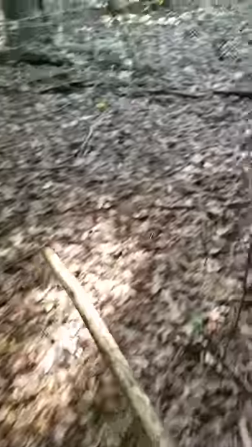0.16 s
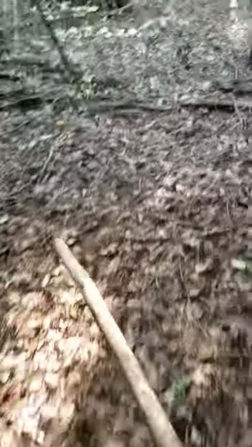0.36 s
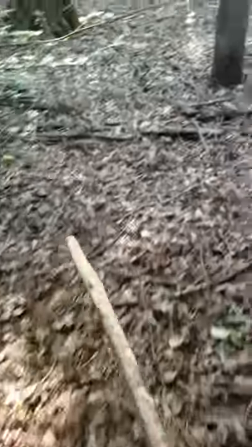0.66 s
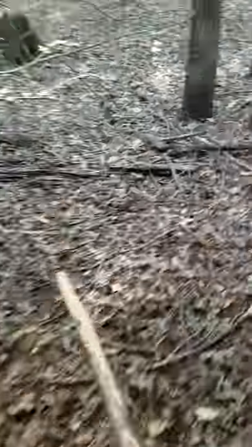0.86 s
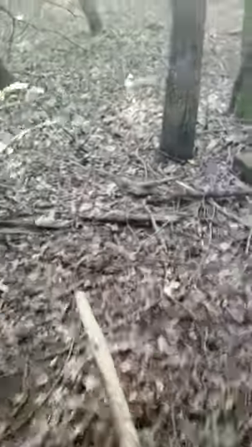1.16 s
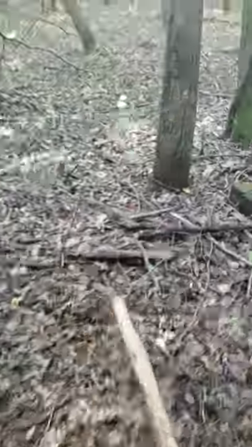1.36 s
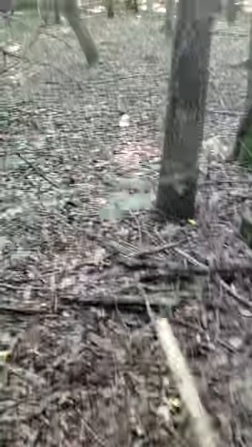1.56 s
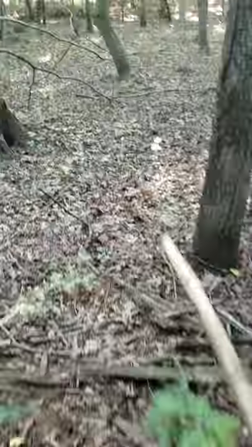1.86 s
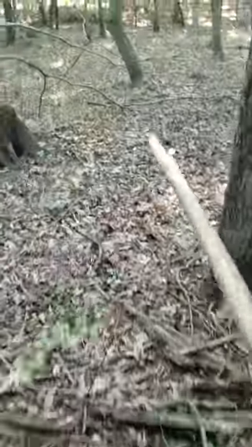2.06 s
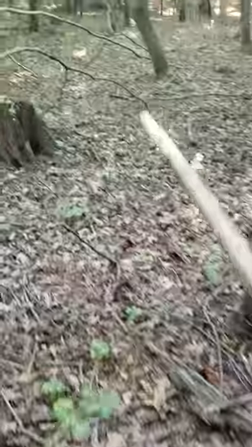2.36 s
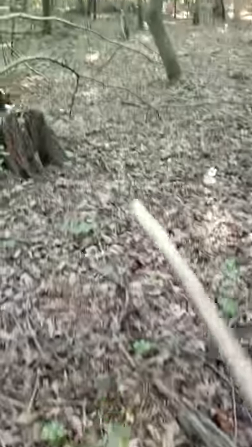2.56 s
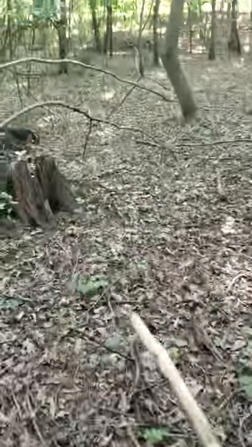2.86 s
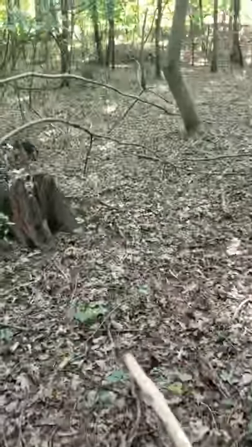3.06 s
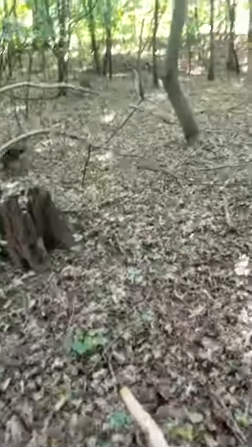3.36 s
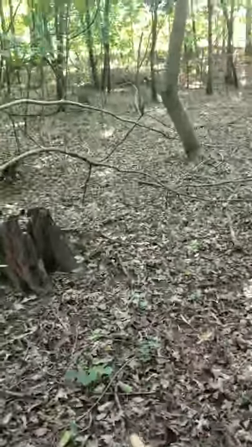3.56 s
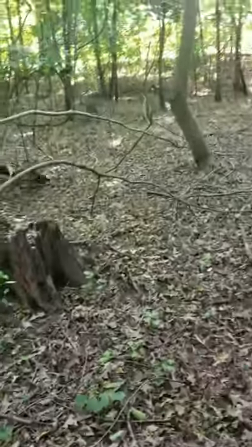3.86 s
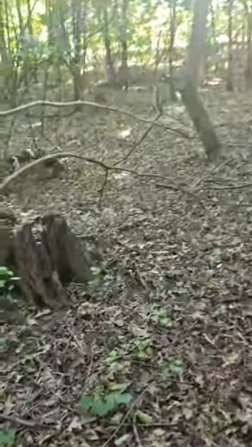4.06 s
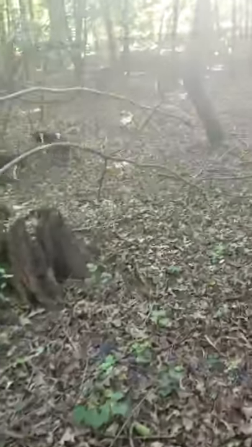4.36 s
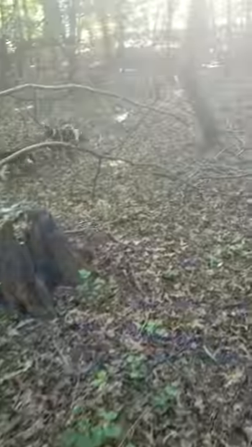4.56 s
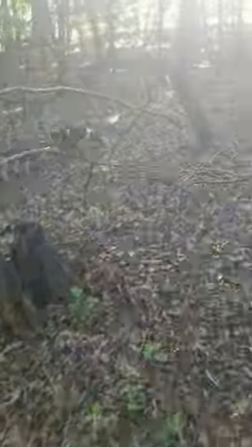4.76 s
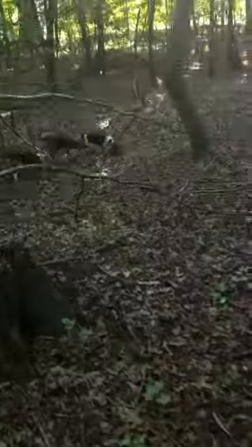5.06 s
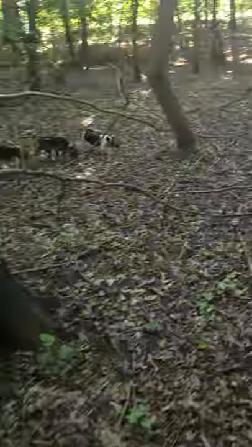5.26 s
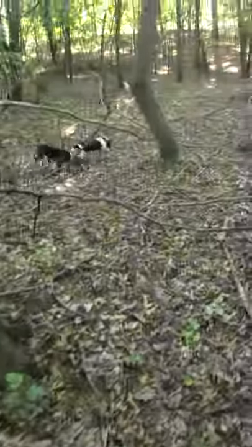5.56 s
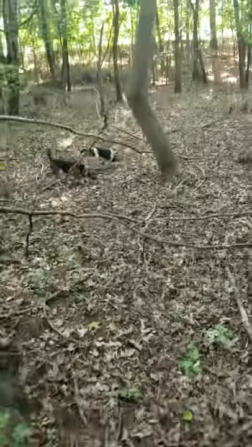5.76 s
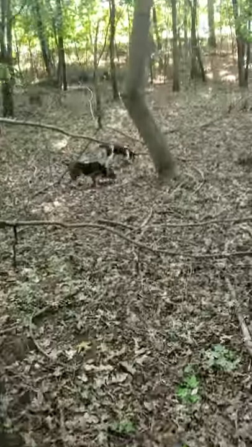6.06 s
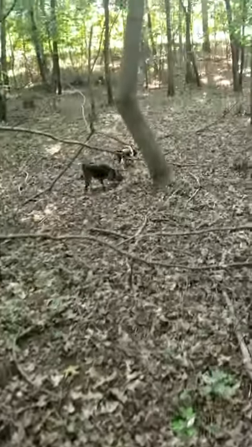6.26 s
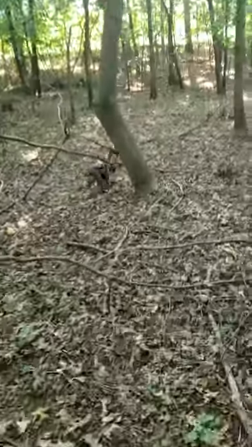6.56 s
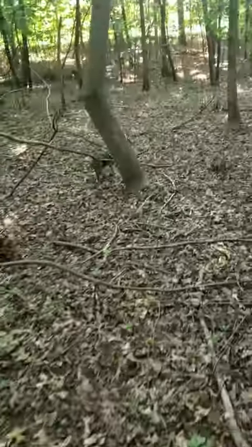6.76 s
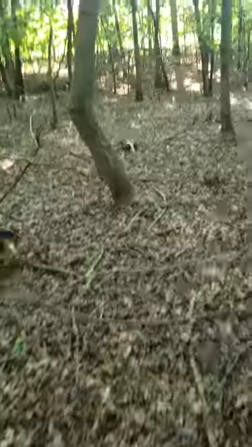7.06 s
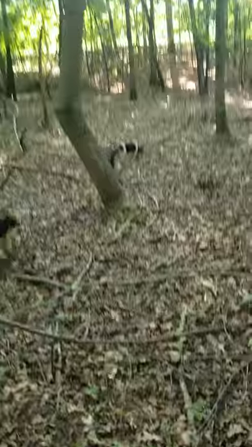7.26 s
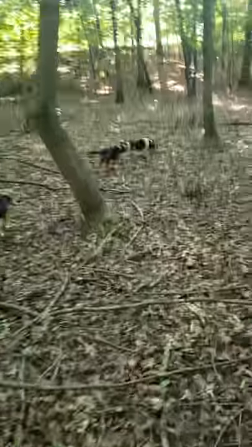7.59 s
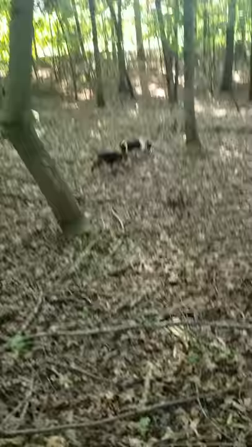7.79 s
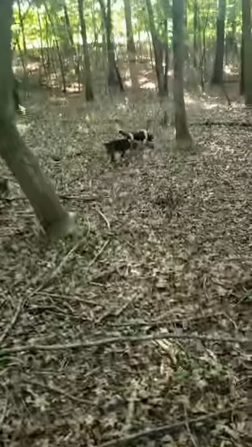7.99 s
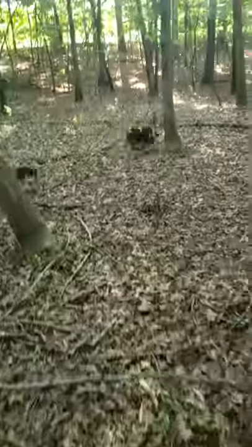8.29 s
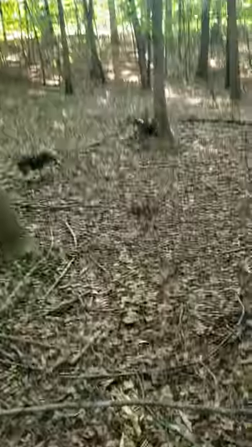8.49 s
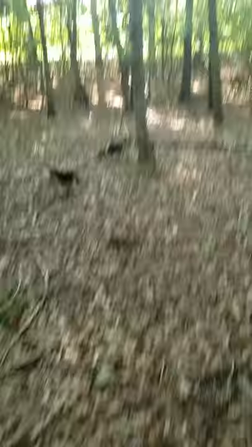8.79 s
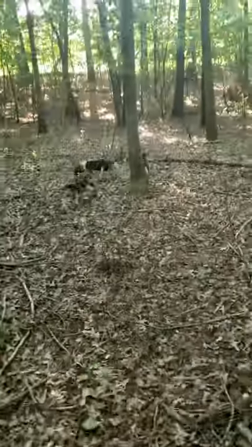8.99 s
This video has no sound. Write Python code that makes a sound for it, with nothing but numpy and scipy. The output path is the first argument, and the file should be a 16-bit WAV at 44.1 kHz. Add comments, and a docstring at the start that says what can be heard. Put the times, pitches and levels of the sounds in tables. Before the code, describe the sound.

Two hounds bay and yelp in quick, overlapping calls in a leafy wood while feet rustle dry leaves and twigs snap close by.

```python
"""Two hounds on a trail in a leafy wood

One hound bays in arched notes, the other yelps high and breaks an octave down: partials on pitch curves, plus
breath noise in throat resonances. A scattered noise tail makes the soft echo of the trunks. Close by, feet rustle
dry leaves (noise and short grains), twigs snap (noise bursts) and a hand knocks the phone (decaying sines).
A faint canopy hiss and a low rumble lie beneath."""
import sys
import numpy as np
from scipy import signal
from scipy.fft import rfft, irfft, next_fast_len
from scipy.io import wavfile
from scipy.ndimage import map_coordinates

SR = 44100
rng = np.random.default_rng(int(sys.argv[2]) if len(sys.argv) > 2 else 0)


def to_wav(sig):
    """Store sig (one row per channel, or 1-D mono) as 16-bit WAV at the path in sys.argv[1].

    Samples outside -1..1 are clipped; the rate is SR.
    """
    pcm = np.clip(np.atleast_2d(sig), -1, 1) * 32767
    pcm = np.round(pcm).astype(np.int16)
    wavfile.write(sys.argv[1], SR, pcm.T)  # frames by channels


N = 402633

# flutter of both voices: depth, knots per second
FLUTTER_DB, FLUTTER_RATE = 2, 70


def amp(db):
    """dB to amplitude."""
    return 10 ** (np.asarray(db) / 20)


def unit(x):
    """Scale to unit RMS."""
    return x / np.sqrt(np.mean(x ** 2) + 1e-20)


def along(points, hz, order=1):
    """Interpolate one column of (f/Hz, value, ..) points on a log frequency axis."""
    table = np.transpose(points)
    return np.interp(np.log(hz + 1), np.log(table[0] + 1), table[order])


def wobble(rate, size=N):
    """Smooth random curve, rate knots per second."""
    knots = rng.standard_normal(int(size * rate / SR) + 4)
    return map_coordinates(knots, [np.arange(size) * rate / SR])


def filtered(x, response):
    """Apply a complex response of frequency in Hz."""
    m = next_fast_len(N + SR // 2)
    spectrum = rfft(x, m) * response(np.fft.rfftfreq(m, 1 / SR))
    return irfft(spectrum, m)[..., :N]


def add(track, start_s, sound):
    """Mix a sound into a track at start_s."""
    part = track[..., round(start_s * SR):][..., :sound.shape[-1]]
    part += sound[..., :part.shape[-1]]


def seconds(size):
    """Time axis of size samples."""
    return np.arange(size) / SR


def port_gain(hz):
    """Two microphone ports differ in colour and phase; each takes half the difference, with opposite sign."""
    # left over right: f/Hz, level/dB, phase lead/rad
    port_points = [(585, 1, 0.48), (1420, 2, 1.48), (3250, 5, 2), (4630, -3.5, -1), (9200, -3.5, -14.5)]
    half = amp(along(port_points, hz) / 2) * np.exp(.5j * along(port_points, hz, order=2))
    return np.array([half, 1 / half])


def ports(x):
    """A far sound as the two ports take it."""
    return filtered(x, port_gain)


def handling():
    """Low rumble of far traffic and air as shaped noise; hand knocks on the phone edges as decaying sines."""
    # rumble spectrum before levelling: f/Hz, density/dB per Hz
    rumble_points = [(20, -26), (64, -4.5), (150, -18), (500, -36.5)]
    # knocks: t/s, level before side offset and decay/dB, edge of the phone
    knocks = [(1.017, -26, "left"), (1.469, -12, "right"), (3.405, -14.5, "left"), (3.587, -16.5, "left"),
              (4.095, -13, "right"), (5.477, -15.5, "right"), (5.564, -15, "both"), (5.631, -8.5, "right")]
    # edge: f/Hz, left offset/dB, right offset/dB
    edge_modes = {"left": (240, 0, -8), "right": (86, -24, 0), "both": (330, 0, 0)}
    shared, own = rng.standard_normal(N), rng.standard_normal((2, N))
    rumble = unit(filtered(shared + own, lambda hz: amp(along(rumble_points, hz))))
    track = rumble * amp([[-48], [-45]])  # left, right
    t = seconds(SR // 10)
    for start_s, db, edge in knocks:
        hz, *sides_db = edge_modes[edge]
        thud = np.sin(2 * np.pi * hz * t)
        decay = amp(-60 * t * hz / 6)  # 60 dB in six cycles
        add(track, start_s, amp(db + np.c_[sides_db]) * thud * decay)
    return track


def rustle_level():
    """Treads rise and fade in power over the steady canopy hiss; the sum flutters at two rates."""
    # treads of feet and paws: t/s, length/s, level above 4.5 kHz before flutter/dB
    treads = [(0.24, 0.041, -35.5), (0.84, 0.1, -45.5), (1.127, 0.34, -48.5), (1.395, 0.3, -36.5),
              (1.989, 0.18, -38), (2.332, 0.66, -42.5), (3.26, 0.24, -40), (3.618, 0.31, -36.5),
              (4.011, 0.18, -39.5), (4.316, 1, -45.5), (5.373, 0.065, -29), (5.46, 0.22, -38.5),
              (5.939, 0.058, -37), (6.28, 0.35, -43), (6.837, 0.57, -43.5), (7.524, 0.41, -43),
              (8.091, .2, -39), (8.346, 0.076, -35.5), (8.699, 0.29, -40)]
    canopy_db, rise_s, fade_s = -55, 0.015, 0.1
    power = np.full(N, amp(canopy_db) ** 2)
    for start_s, length_s, db in treads:
        t = seconds(round((length_s + 0.27) * SR))
        fade = np.exp(-np.clip(t - length_s, 0, 1) / fade_s)
        add(power, start_s, (amp(db) * np.clip(t / rise_s, 0, 1) * fade) ** 2)
    return np.sqrt(power) * amp(2.5 * wobble(9) + 2.5 * wobble(30))


def stereo_noise(*rows):
    """Noise with equal shared and per-channel parts."""
    return rng.standard_normal((*rows, 1, N)) + rng.standard_normal((*rows, 2, N))


def leaf_crackle():
    """Steady hiss plus random short crunches of big to small leaves, each size in its own band."""
    cracks_per_s, decay60_s = 25, .012
    band_hz = np.reshape([4000, 8000, 13000], (3, 1, 1))
    heights = amp(6 * rng.exponential(size=(3, N))).clip(0, 10)
    cracks = (rng.random((3, N)) < cracks_per_s / SR) * heights
    decay = amp(-60 * seconds(SR // 20) / decay60_s)
    bursts = signal.fftconvolve(cracks, decay[None], axes=1)[:, None, :N]

    def bands(hz):
        return band_hz ** -.5 / (1 + (np.log(hz / band_hz + 1e-9) / .4) ** 2)

    grains = filtered(bursts * stereo_noise(3), bands)
    crunch = sum(unit(g) * (k + 1) for k, g in enumerate(grains))  # smaller leaves weigh more
    return unit(stereo_noise()) + .9 * unit(crunch)


def twig_snaps():
    """Twigs and crisp leaves: high-passed noise bursts with a sharp decay and a weak slower one."""
    # t/s, level before leaf colour and scaling/dB
    snaps = [(0.152, -28.5), (0.2483, -16), (0.2927, -17), (.848, -31), (1.346, -29), (1.47, -14),
             (1.5183, -17.5), (1.5722, -16.5), (1.728, -19), (2.1238, -19.5), (2.8624, -17), (3.4124, -19),
             (4.0956, -19), (4.7497, -19.5), (4.9636, -20.5), (5.4755, -8.5), (5.5671, -9.5),
             (6.4573, -20.5), (7.0831, -18), (7.8303, -20.5), (9.0019, -16.5)]
    track = np.zeros((2, N))
    high_pass = signal.butter(2, 2000, "high", fs=SR)
    t = seconds(SR // 20)
    decay = amp(-60 * t / .009) + .07 * amp(-60 * t / .05)
    for start_s, db in snaps:
        noise = signal.lfilter(*high_pass, rng.standard_normal((2, len(t))))
        add(track, start_s, amp(db) * decay * noise)
    return track


def underfoot():
    """Leaf crackle under each tread, canopy hiss and snaps share one colour, scaled on the crackle's treble."""
    # relative spectrum: f/Hz, density/dB per Hz
    leaf_points = [(350, 1), (2000, -1.5), (5000, -4), (8000, -4.5), (9800, -10), (12000, -7.5)]

    def colour(hz):
        return amp(along(leaf_points, hz)) * port_gain(hz) * (hz > 100)

    level, crackle, twigs = rustle_level(), leaf_crackle(), twig_snaps()
    treble_rms = np.std(filtered(crackle, lambda hz: colour(hz) * (hz > 4500)))
    return filtered(level * crackle + twigs, colour) / treble_rms


def trunks(x):
    """Near trunks scatter a short bright tail, far ones a long dull tail; scatter smears the echo's pitch."""
    near60_s, far60_s, rise_s = .35, 1.2, .01
    t = seconds(SR)
    shared, own = rng.standard_normal(SR), rng.standard_normal((2, SR))
    decays = np.array([4 * amp(-60 * t / near60_s), amp(-60 * t / far60_s)])[:, None]
    tails = (shared + own) * decays * np.clip(t / rise_s, 0, 1)
    tails = tails / np.linalg.norm(tails[:, 0])
    smeared = x * unit(wobble(90))  # a random wobble widens the spectral lines
    near, far = signal.fftconvolve(smeared[None, None], tails, axes=2)[..., :N]
    bright = filtered(near, lambda hz: np.clip(hz / 1200, 0, 1))
    dull = filtered(far, lambda hz: hz / 900 / (1 + (hz / 1500) ** 4))
    return bright + dull


def tone(hz, partials_db, effort=1, rough=0):
    """Vocal folds on a pitch curve: higher partials are hoarser and fail sooner when effort sags."""
    size = len(hz)
    phase = 2 * np.pi * np.cumsum(hz * (1 + .013 * wobble(FLUTTER_RATE, size))) / SR
    sound = 0
    for k, db in enumerate(partials_db):
        hoarse = (k + rough) / (k + rough + 4)
        noise = wobble(110, size) + 1j * wobble(110, size)
        cycles = np.exp(1j * (k + 1) * phase) * (1 - hoarse + hoarse * noise)
        level = amp(db + (2 + k / 2) * wobble(40, size))
        sound = sound + level * effort ** k * cycles.real
    return sound


def yelps():
    """A whistle-like note leaps up and slides down, drops an octave briefly, then trails off high and dull."""
    # t/s, break after/s, length/s, peak f/Hz, level/dB; a yelp that ends first keeps only a faint low octave
    # note and never drops to it fully
    yelp_rows = [(0.009, 0.076, 0.22, 1369, -32), (0.378, 0.077, 0.22, 1404, -25.5),
                 (0.775, 0.16, 0.17, 1374, -34), (1.126, 0.087, 0.19, 1400, -32.5),
                 (1.461, 0.11, 0.092, 1450, -33), (1.808, 0.08, 0.24, 1404, -28.5),
                 (3.673, 0.066, 0.15, 1479, -22), (3.997, 0.065, 0.22, 1487, -26),
                 (4.314, 0.093, 0.13, 1388, -25), (4.665, 0.08, 0.15, 1437, -21),
                 (4.981, 0.073, 0.18, 1382, -23.5), (5.554, 0.065, 0.17, 1437, -22.5),
                 (5.741, 0.057, 0.12, 1287, -24.5), (5.91, 0.203, 0.17, 1449, -27),
                 (6.452, 0.073, 0.21, 1454, -25), (6.801, 0.073, 0.14, 1444, -26.5),
                 (7.549, 0.097, 0.14, 1349, -27), (7.914, 0.073, 0.22, 1414, -23.5),
                 (8.288, 0.076, 0.21, 1398, -21.5), (8.839, 0.082, 0.21, 1402, -26)]
    # partials of the high note: level/dB
    whistle_db = [0, -8, -21, -30]
    leap_s, trail_s, plunge_s, low_s = .02, .07, .012, .06
    leap_from, slid_to, trail_to, plunge = .75, .92, .82, .3  # shares of pitch
    dip_db, trail_db = -11, -5  # high note under the low one, and after it
    low_db = 12  # low note over high, before its own envelope
    clear, rasp = np.zeros(N), np.zeros(N)
    for start_s, break_s, length_s, peak_hz, db in yelp_rows:
        t = seconds(round(length_s * SR))
        since_s = t - break_s
        times = [0, leap_s, break_s, break_s + trail_s]
        pitch = peak_hz * np.interp(t, times, [leap_from, 1, slid_to, trail_to])
        pitch = pitch * (1 - plunge * np.exp((t - length_s) / plunge_s))
        edges = amp(db) * np.clip(t / leap_s, 0, 1) * np.clip((length_s - t) / plunge_s, 0, 1)
        dip = np.interp(since_s, [-.004, .004, low_s], [0, dip_db, trail_db])
        high = edges * amp(FLUTTER_DB * wobble(FLUTTER_RATE, len(t)) + dip)
        swell = np.interp(since_s, [-.002, .002, 0.78 * low_s, 1.2 * low_s], [0.015, 0.43, 0.34, 0.018])
        low = edges * amp(low_db) * swell
        effort = (pitch / peak_hz) ** 3 * np.where(t < break_s, 1, .5) * np.exp(-t / 0.6)
        add(clear, start_s, high * tone(pitch, whistle_db, effort=effort, rough=0.34))
        add(clear, start_s, low * tone(peak_hz * (.475 - 0.326 * since_s), [0, -12, -16], rough=0.77))
        add(rasp, start_s, low * amp(-11))
    return clear, rasp


def bays():
    """The pitch leaps up, holds and plunges at the end; a second, falling tone and rasp roughen the note."""
    # t/s, length/s, early f/Hz, late f/Hz, level/dB, octave over fundamental/dB, second tone level/dB
    bay_rows = [(0.233, 0.19, 591.6, 609, -36, 5, -32), (0.639, 0.15, 589.3, 604, -34, 4.5, -26.5),
                (1.058, 0.15, 530, 620, -41, 1, -32), (1.467, 0.25, 574.4, 635.3, -32, 0, -29.5),
                (1.893, 0.2, 577, 561, -37.5, 5.5, -27.5), (2.338, 0.16, 573, 589, -34, 5.5, -26.5),
                (2.631, 0.16, 557, 627, -30, -11, -23.5), (2.974, 0.17, 611, 610, -25.5, -3, -35.5),
                (3.351, 0.16, 567, 584, -28.5, 0.5, -24.5), (3.637, 0.12, 569, 601, -29.5, 2, -23.5),
                (3.789, 0.15, 612, 606, -24.5, -2, -44), (4.002, 0.14, 556.6, 600, -31, -7, -33.5),
                (4.181, 0.077, 420, 384, -46.5, 8.5, -49), (4.693, 0.15, 607, 612, -20.5, -7.5, -31.5),
                (5.305, 0.16, 538.3, 595, -27, 1, -21.5), (5.811, 0.078, 554, 699, -38.5, 8, -47),
                (6.141, 0.158, 538.6, 602.3, -28.5, -10.5, -26.5), (6.903, 0.16, 556, 524, -35.5, 1.5, -24),
                (7.164, 0.15, 625, 675.6, -19, 0, -22), (7.555, 0.165, 573, 565.4, -28.5, 13.5, -26.5),
                (7.696, 0.11, 601, 622, -24, -40, -22), (8.115, 0.15, 527, 604, -29.5, -6.5, -24.5),
                (8.47, 0.2, 593, 565.4, -26, -7, -22), (9.101, 0.24, 592, 593, -27.5, 6.5, -20.5)]
    # third to fifth partial over the note, before the octave and second-tone terms: level/dB
    upper_base_db = [-5, -14, -18]
    swell_db_per_hz, push_db = 0.0936, 0.5  # louder as pitch climbs, and towards the end
    octave_share = .4  # share of the octave's dB that the upper partials follow
    choke = .34  # dB lost per step above the third partial, per dB of second tone over the note
    clear, rasp = np.zeros(N), np.zeros(N)
    for start_s, length_s, early_hz, late_hz, db, octave_db, second_db in bay_rows:
        t = seconds(round(length_s * SR))
        share = t / length_s
        over_db = second_db - db
        held_hz = np.interp(share, [.3, .75], [early_hz, late_hz])
        arch = 1 - .25 * np.exp(-t / .011) - .4 * np.exp((t - length_s) / .011)
        edges = np.clip(t / .011, 0, 1) * np.clip((length_s - t) / .016, 0, 1)
        level = edges * amp(db + swell_db_per_hz * (held_hz - held_hz.mean()) + push_db * share)
        level = level * amp(FLUTTER_DB * wobble(FLUTTER_RATE, len(t)))
        upper_db = octave_share * octave_db + np.array(upper_base_db) - choke * np.arange(3) * over_db
        rough = amp(over_db - 14.5).clip(0, 1)
        note = tone(held_hz * arch, np.r_[0, octave_db, upper_db], effort=arch, rough=rough)
        add(clear, start_s, level * note)
        swell = amp(second_db + FLUTTER_DB * wobble(FLUTTER_RATE, len(t)))
        swell = swell * np.exp(-((share - .3) / 0.26) ** 2)
        falling_hz = (900 - 1100 * t) * (1 + 0.0313 * wobble(20.5, len(t)))
        add(clear, start_s, swell * tone(falling_hz, [0], rough=1))
        add(rasp, start_s, edges * amp(max(second_db - 9, db - 15)))
    return clear, rasp


def throat_breath():
    """Breath noise at unit RMS that flutters on its own in each throat resonance."""
    # f/Hz, half width/Hz, relative level/dB
    throat = [(820, 213, -7), (1214, 180, -9.5), (1766, 530, -19.5), (2460, 760, -12.5)]
    breath = 0
    for centre_hz, width_hz, db in throat:
        band = filtered(rng.standard_normal(N), lambda f: 1 / (1 + ((f - centre_hz) / width_hz) ** 4))
        breath = breath + amp(db + 3 * wobble(45)) * unit(band)
    return unit(breath)


def hounds():
    """Both voices, breath noise on their rasp levels, and short rising throat pops that open some barks."""
    # t/s, peak level/dB, starting f/Hz
    pops = [(.635, -25, 930), (2.321, -28.5, 890), (2.981, -22, 930), (4.707, -15, 980), (5.745, -17, 813),
            (6.449, -12.5, 1015), (8.85, -19, 1010), (9.1, -17, 820)]
    bay, bay_rasp = bays()
    yelp, yelp_rasp = yelps()
    voices = bay + yelp + (bay_rasp + yelp_rasp) * throat_breath()
    t = seconds(round(0.021 * SR))
    for start_s, db, hz in pops:
        rising = np.sin(2 * np.pi * hz * (t + 3 * t * t))
        add(voices, start_s - .003, amp(db) * np.sin(np.pi * t / t[-1]) * rising)
    return voices


def scene():
    """Hounds direct and echoed, over leaves, twigs, rumble and knocks."""
    pack = hounds()
    return ports(pack) + amp(-8.5) * trunks(pack) + underfoot() + handling()


def record(dry):
    """The phone keeps nothing above its band limit."""
    top_hz = 15750
    return filtered(dry, lambda hz: hz < top_hz)


dry = scene()
out = record(dry)
to_wav(out)
```